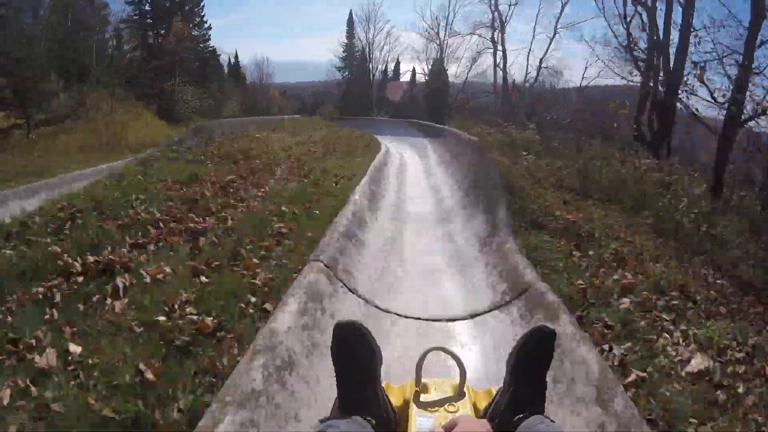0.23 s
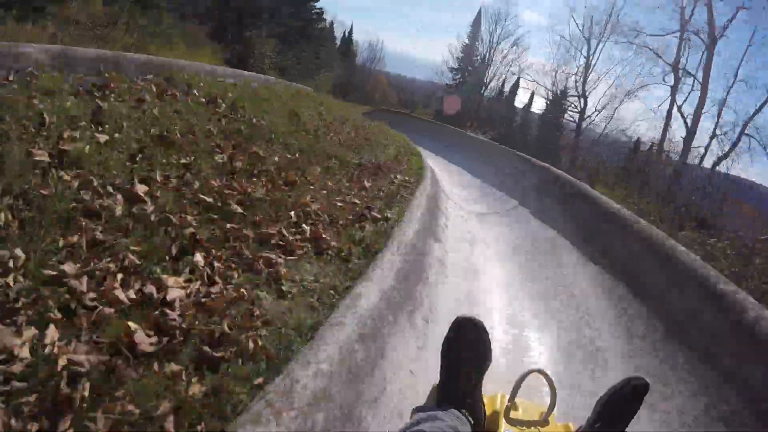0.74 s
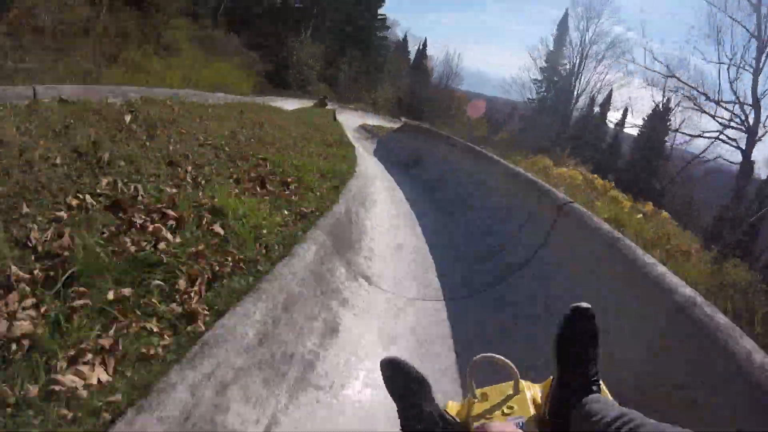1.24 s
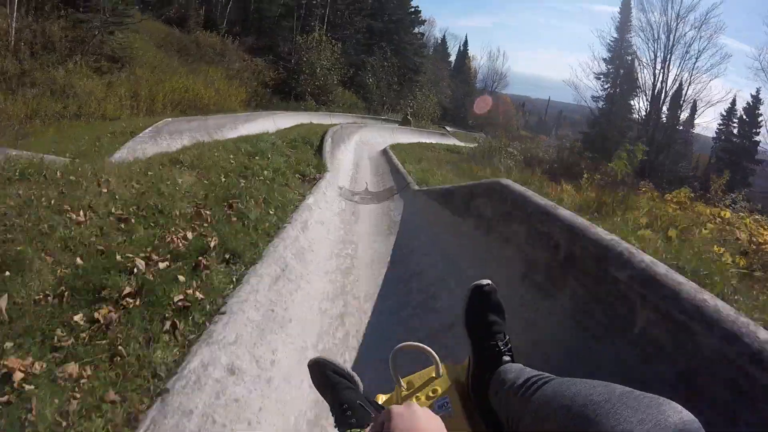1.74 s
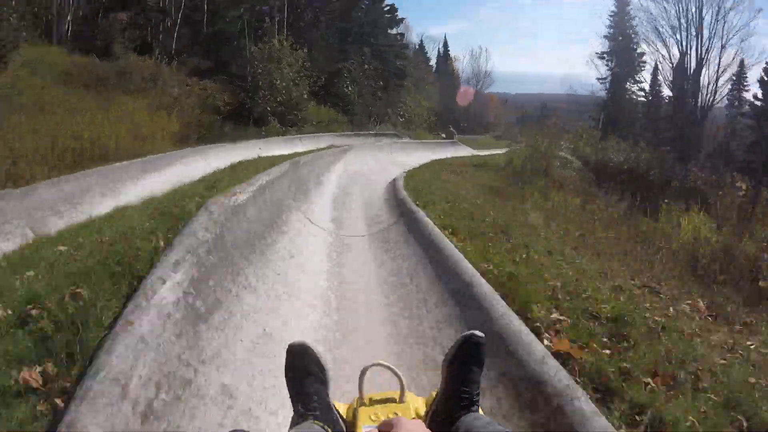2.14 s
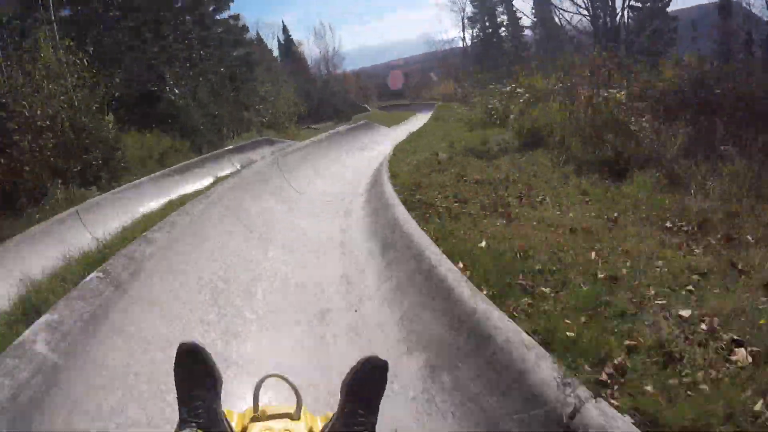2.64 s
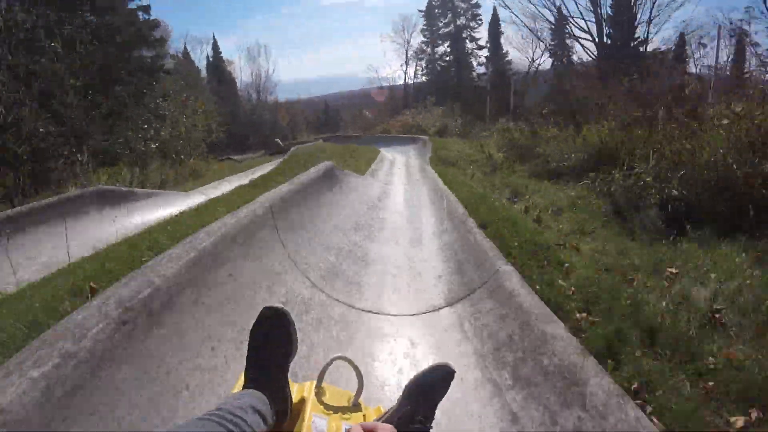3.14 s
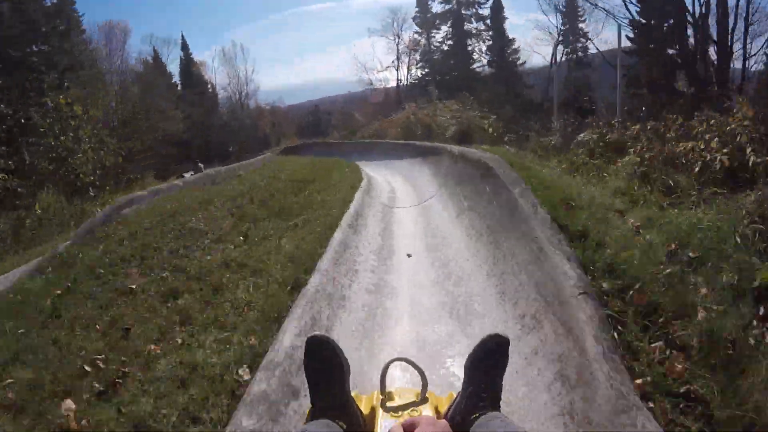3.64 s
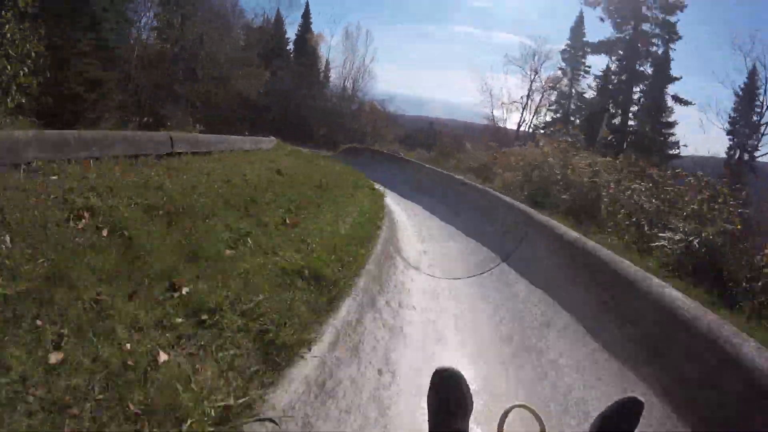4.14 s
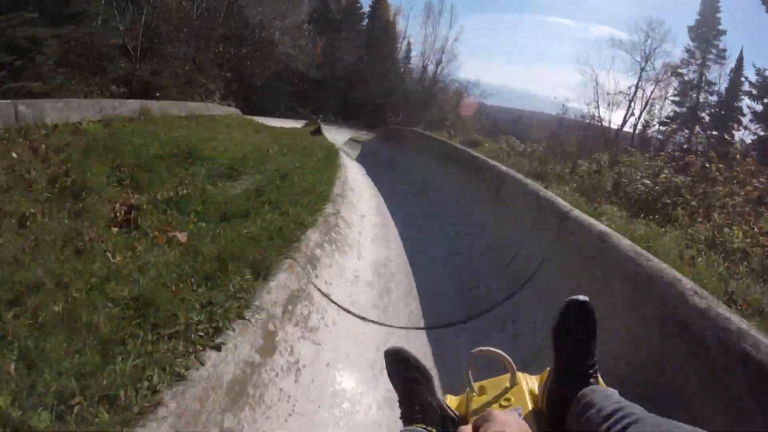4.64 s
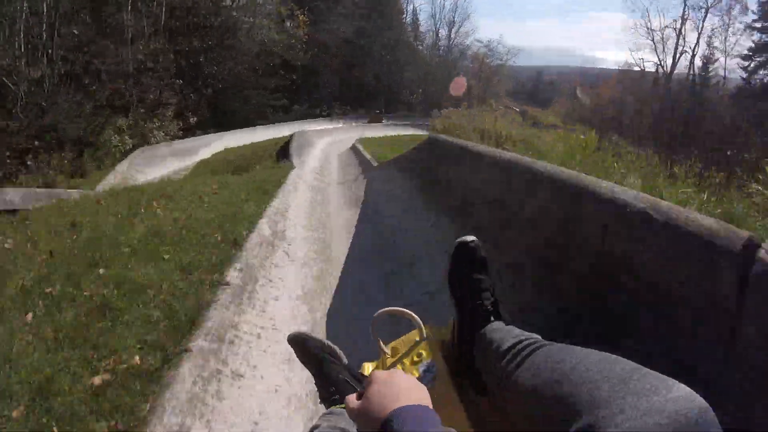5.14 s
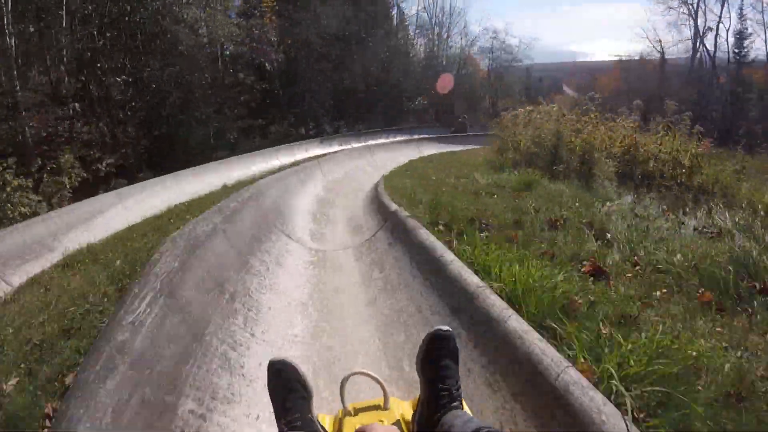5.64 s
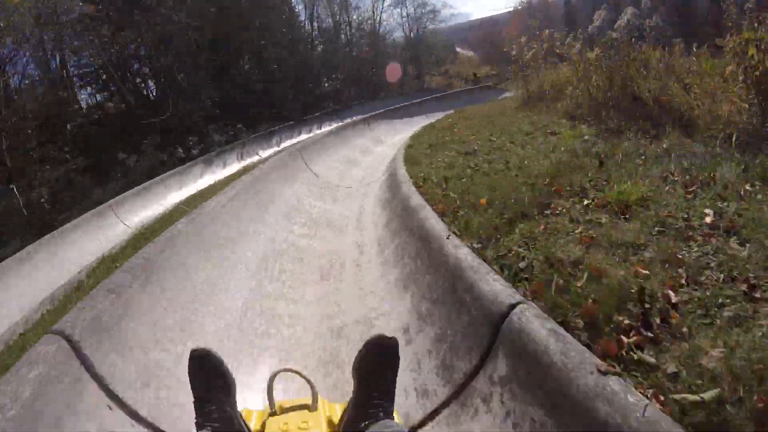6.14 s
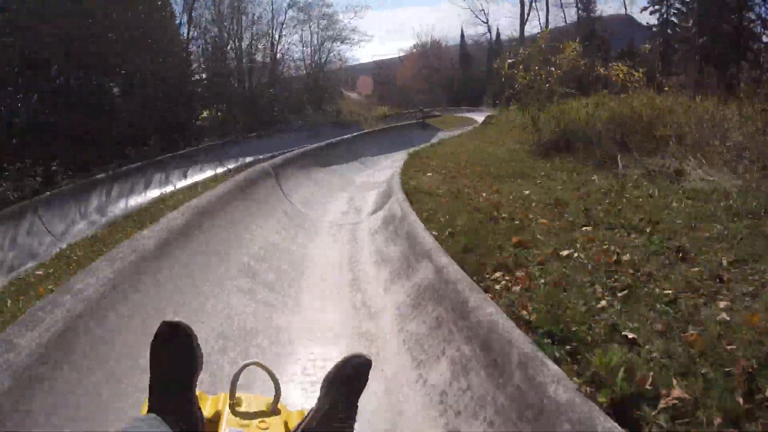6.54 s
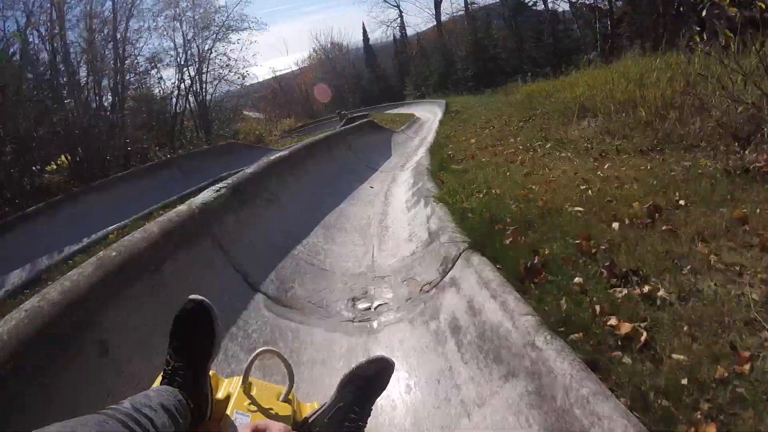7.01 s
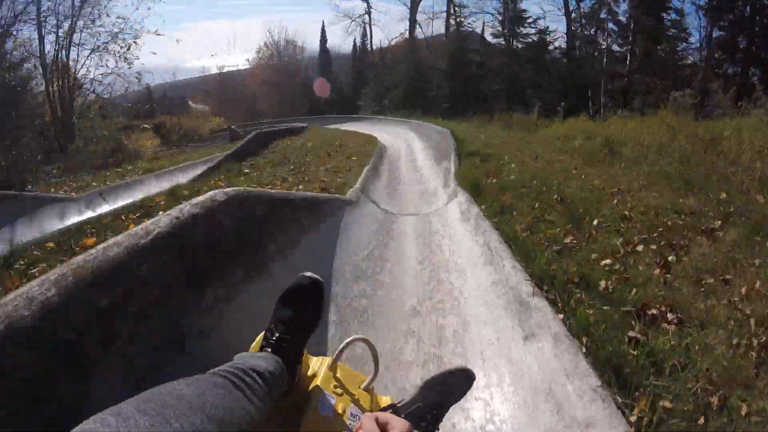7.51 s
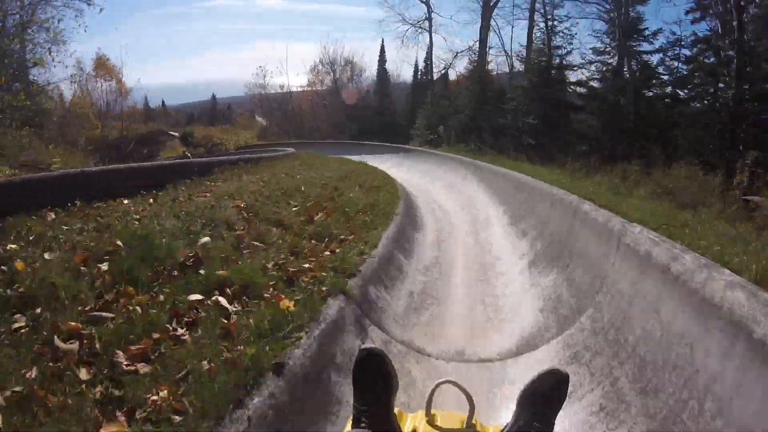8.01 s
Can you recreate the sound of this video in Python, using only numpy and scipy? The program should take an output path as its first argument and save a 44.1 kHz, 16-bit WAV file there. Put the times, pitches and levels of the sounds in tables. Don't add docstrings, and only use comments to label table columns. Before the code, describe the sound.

Steady, uneven sled rumble with muffled wheel grind and fine grit hiss, close and dry outdoors. Wind thuds and flutters on the microphone housing. Slab joints give sudden blunt thumps, each briefly ducking the other sound; small rattles and short hollow body rings fill the gaps. Heavy knocks cluster in the first two seconds, before five and past seven, ending in a low wind gust.

```python
import sys
import numpy as np
from scipy import signal
from scipy.fft import irfft, next_fast_len
from scipy.io import wavfile
from scipy.ndimage import uniform_filter1d

SR = 44100
rng = np.random.default_rng(int(sys.argv[2]) if len(sys.argv) > 2 else 0)


def convert_level_to_amplitude(level_db):
    exponent = np.asarray(level_db, float) / 20
    return 10 ** exponent


def wav_record(signal):
    frames = np.transpose(np.atleast_2d(signal))
    bounded = np.clip(frames, -1, 1)
    quanta = np.round(bounded * 32767).astype(np.int16)
    wavfile.write(sys.argv[1], SR, quanta)


N = 364707
WHEELBASE_S = 0.049


def evened(x):
    return x / np.sqrt(np.mean(x ** 2) + 1e-20)


def read(points, hz):
    f, db = np.transpose(points)
    return np.interp(np.log(hz + 1), np.log(f + 1), db, left=-100, right=-100)


def add(mix, s, sound):
    part = mix[max(round(s * SR), 0):][:len(sound)]
    part += sound[:len(part)]


def colour(points, size=4096):
    log_gain = np.log(convert_level_to_amplitude(read(points, abs(np.fft.fftfreq(size, 1 / SR)))))
    spectrum = np.exp(np.conj(signal.hilbert(log_gain)))
    taps = np.fft.ifft(spectrum).real[:size // 2]
    return taps / np.linalg.norm(taps)


def wander(hz):
    f = np.fft.rfftfreq(next_fast_len(N), 1 / SR)
    z = rng.standard_normal((len(f), 2)) @ [1, 1j]
    slope = (f > 3) / np.sqrt(f + 1) / (1 + (f / hz) ** 4)
    return evened(irfft(z * slope)[:N])


def patchy(points, patch_db, size):
    hop = size // 4
    a, b, patches = rng.standard_normal((N // hop + 5, size // 2 + 1, 3)).T
    patches = uniform_filter1d(patches, size=4, axis=0)
    patches = evened(uniform_filter1d(patches, size=8, axis=1))
    spectrum_db = read(points, np.fft.rfftfreq(size, 1 / SR))[:, None]
    z = (a + 1j * b) * convert_level_to_amplitude(spectrum_db + patch_db * patches)
    return evened(signal.istft(z, nperseg=size, noverlap=size - hop)[1][:N])


# (time [s], drop [dB], recovery [s])
DUCKS = [(0.2, 1, 0.055), (0.496, 7, 0.092), (1.155, 3, 0.11), (1.465, 7, 0.092), (2.202, 4.5, 0.16),
         (4.465, 3, 0.069), (4.862, 7.5, 0.19), (6.665, 8.5, 0.071), (7.229, 6, 0.13), (7.531, 6.5, 0.14),
         (7.98, 3.5, 0.082)]


def duck_db(t):
    drop_in_s = 0.0054
    total = 0
    for s, drop_db, recovery_s in DUCKS:
        onset = np.clip((t - s) / drop_in_s + 1, 0, 1)
        recovery = np.exp(-np.maximum(t - s, 0) / recovery_s)
        total = total - drop_db * onset * recovery
    return total


# (frequency [Hz], level [dB per Hz])
WIND_SPECTRUM = [(8.8, -38.5), (15, -8), (54, 0), (177, -9.5), (260, -12), (340, -24), (570, -120)]
# (frequency [Hz], level [dB per Hz])
AIR_SPECTRUM = [(1500, -27), (3000, -0.5), (4700, -8.5), (6000, -5), (7000, -2.5), (8000, -10.5),
                (12200, -2), (14000, -28.5), (16500, -43.5)]
# (time [s], level [dB])
GUSTS = [(0.1, -21.5), (0.35, -16.5), (0.9, -19), (1.3, -24), (1.68, -15.5), (1.82, -24.5), (2.35, -14.5),
         (2.55, -23.5), (2.72, -16.5), (3.15, -27.5), (3.52, -18.5), (4.7, -17), (5.25, -23.5), (5.55, -17),
         (6.0, -24.5), (7.95, -22), (8.2, -11), (8.27, -22)]


def wind():
    t = np.arange(N) / SR
    rush = convert_level_to_amplitude(-76) * patchy(AIR_SPECTRUM, 0.89, size=512)
    gust_s, gust_db = np.transpose(GUSTS)
    level_db = np.interp(t, gust_s, gust_db) + 1.64 * duck_db(t)
    return convert_level_to_amplitude(level_db) * patchy(WIND_SPECTRUM, 2.8, size=2048) + rush


def rear_hits():
    hard_db = -4
    return [(s + WHEELBASE_S, db) for s, db, *rest in KNOCKS if db > hard_db]


# (time [s], load on the wheels [dB], grit on the slab [dB])
TRACK = [(0.0, 1, 1), (0.45, 0.5, -1), (1.08, 1.5, 1.5), (1.4, 1, -2), (1.8, 1, 0.5), (2.15, 0.5, 1),
         (2.5, -1, 4.5), (2.62, 6, 1.5), (3.2, 4, -2), (3.58, 2, 4), (3.8, 0, -2), (4.3, 2.5, -1.5),
         (4.75, -2.5, 1), (5.399, 2, 2), (5.7, 0, -2), (7.0, 2.5, -2), (7.75, -1.5, 3.5), (8.27, -2, 3)]
# (centre [s], half length [s], load [dB], grit [dB])
RUBS = [(0.432, 0.012, 5, -11), (0.694, .04, 0, 5.5), (1.343, 0.024, 5.5, -4), (1.42, 0.008, 10.5, -4),
        (2.203, 0.035, 5, -8), (3.59, 0.03, 1.5, -4.5), (4.414, 0.018, 7, -7), (4.828, 0.039, 9, -11),
        (5.1, 0.035, 6.5, -5.5), (6.647, 0.031, 4, 2.5), (6.776, 0.017, 6.5, 0.5),
        (7.007, 0.057, 4.5, -2.5), (7.195, 0.025, 2, 0), (7.51, 0.053, 4, -2), (7.952, 0.032, 7, -9),
        (1.624, 0.046, 2.5, 3.5), (2.05, 0.06, 2.5, -1), (2.728, 0.024, 0, -1.5), (5.448, 0.1, -2, 7.5),
        (5.622, .05, -3, 4), (5.97, .06, -3.5, 7.5), (6.193, 0.13, 2.5, 1.5), (7.716, 0.077, 2, 4.5),
        (6.341, 0.0081, 6.5, -5), (0.85, 0.04, 1.5, -4.5), (5.164, 0.016, -2, -3), (2.305, 0.026, -3, 3)]
# (landing [s], time in the air [s], loss of load [dB])
HOPS = [(0.152, 0.063, 6), (0.79, 0.086, 2), (1.6, 0.098, 2), (1.89, 0.095, 7), (2.588, 0.087, 2),
        (3.72, 0.15, 0.5), (3.937, 0.14, 5), (4.021, 0.12, 3.5), (4.801, 0.024, -1.5), (5.261, 0.16, 0.5),
        (5.359, 0.074, 9.5), (6.062, 0.038, 5.5), (6.135, 0.053, 4), (7.935, 0.033, 4.5),
        (0.842, 0.023, 2.5), (1.138, 0.017, 5.5), (2.14, 0.013, 5), (3.764, 0.015, 4.5), (6.164, .02, 4),
        (6.287, 0.021, 3.5), (6.622, 0.025, 3), (7.514, 0.016, 3.5)]


def contact(t):
    slam_share, slam_s = 0.44, 0.023
    settle = 90
    s, load, grit = np.transpose(TRACK)
    load, grit = np.interp(t, s, load), np.interp(t, s, grit)
    for mid, half, load_db, grit_db in RUBS:
        bell = np.exp(-((t - mid) / half) ** 2)
        load, grit = load + load_db * bell, grit + grit_db * bell
    rear_hops = [(s, 0.42 * WHEELBASE_S, 1.5) for s, db in rear_hits()]
    for land, air, loss_db in HOPS + rear_hops:
        light = np.clip(1 + (t - land) / air, 0, 1) * (t < land)
        slam = slam_share * np.exp(-abs(t - land) / slam_s) * (t >= land)
        load = load + loss_db * (slam - np.sqrt(light))
    load = uniform_filter1d(uniform_filter1d(load, size=settle), size=settle)
    return load, grit


# (centre [s], half length [s], level [dB])
SCRAPES = [
    (0.2, 0.024, -5),
    (4.154, 0.04, 6.5),
    (4.295, 0.076, 8),
    (4.575, 0.069, 7.5),
    (6.25, 0.095, -2.5),
]


def scrape_db(t):
    return sum(db * np.exp(-((t - mid) / half) ** 2) for mid, half, db in SCRAPES)


# (frequency [Hz], level [dB per Hz])
BODY = [(90, -40), (170, -1.5), (260, -1), (360, 0.5), (480, -5.5), (830, -6), (1100, -20), (1500, -44.5),
        (2400, -59.5)]
# (frequency [Hz], level [dB per Hz])
GRIND = [(600, -26), (1200, 4.5), (1770, -2.5), (2570, -5), (2840, -14), (3740, -9), (4200, -20),
         (4800, -26.5), (5600, -51.5)]
# (frequency [Hz], level [dB per Hz])
HISS = [(3800, -35.5), (4800, -8.5), (5800, -2), (6700, -3.5), (7600, -15), (9000, -16.5), (11900, -21),
        (14000, -34.5), (16500, -54)]


def rolling():
    t = np.arange(N) / SR
    shake = wander(120)
    body = patchy(BODY, 1.03, size=512) * convert_level_to_amplitude(2.15 * shake + wander(90))

    grain_size = convert_level_to_amplitude(1.3 * np.minimum(rng.exponential(1, N), 5))
    struck = rng.random(N) < 400 / SR
    grit = grain_size * struck * rng.choice([-1.0, 1.0], N)
    grains = evened(signal.oaconvolve(grit, colour(GRIND))[:N])
    grind = (patchy(GRIND, 2.2, size=256) + 0.36 * grains) * convert_level_to_amplitude(1.5 * shake + 0.58 * wander(150))
    hiss = patchy(HISS, 2.4, size=256) * convert_level_to_amplitude(2.1 * shake + 0.58 * wander(150))

    load, rough = contact(t)
    load = load + duck_db(t)
    body_db = -24 + load
    grind_db = -48 + 1.11 * load + 0.6 * rough + scrape_db(t)
    hiss_db = -63.5 + 1.11 * load + rough
    return convert_level_to_amplitude(body_db) * evened(body) + convert_level_to_amplitude(grind_db) * evened(grind) + convert_level_to_amplitude(hiss_db) * evened(hiss)


# (time [s], crack level [dB], decay by 60 dB [s])
JOLTS = [(0.196, -27, 0.038), (0.4414, -28.5, .03), (0.486, -21, 0.021), (1.4162, -36, .041),
         (1.7624, -27, .03), (1.8891, -32, .08), (1.9669, -29, .034), (2.1705, -24, .042),
         (2.4563, -38, .02), (2.589, -28, 0.023), (3.8478, -27, 0.013), (3.9345, -30, .026),
         (4.0203, -25.5, .021), (4.4532, -20, 0.024), (5.2719, -26, 0.023), (5.3582, -24, 0.034),
         (5.5074, -28, 0.088), (5.6161, -27, .03), (6.0616, -25, 0.057), (6.1639, -22.5, 0.028),
         (6.2871, -24.5, .024), (6.3804, -25, 0.039), (6.4837, -27.5, 0.04), (6.8528, -26, 0.044),
         (7.0698, -24.5, .03), (7.1546, -24, 0.024), (7.4515, -27.5, 0.07), (7.5156, -10.5, 0.016),
         (7.9374, -20.5, .036), (7.9554, -20, 0.03)]
# (time [s], crack level [dB])
CHATTER = [(2.84, -25.5), (2.87, -32), (2.9148, -24), (2.9942, -24), (3.042, -29), (3.1425, -23.5),
           (3.2106, -23.5), (3.302, -25.5), (3.386, -24.5), (3.4116, -36), (3.4979, -24.5), (3.598, -25),
           (6.9381, -24.5), (6.9778, -21.5), (7.0137, -19.5), (7.0234, -22), (0.153, -41), (0.2754, -41),
           (0.379, -35), (0.7994, -36), (1.053, -32), (1.8148, -39), (4.9332, -36), (5.0893, -36),
           (5.403, -36), (6.3395, -31), (8.1857, -33), (3.75, -33), (4.2492, -31), (4.705, -33)]


def jolts():
    t, out = np.arange(3000) / SR, np.zeros(N)
    rows = JOLTS + [(s, db, 0.06) for s, db in CHATTER]
    rows += [(s, db - 35, 0.024) for s, db in rear_hits()]
    grind, hiss = colour(GRIND), colour(HISS)
    for s, db, t60 in rows:
        a, b = rng.standard_normal((2, len(t)))
        burst = (1 - np.exp(-t / 0.00016)) * convert_level_to_amplitude(-60 * t / t60)
        low_crack = signal.fftconvolve(a * burst, grind)
        high_crack = signal.fftconvolve(b * burst, hiss)
        add(out, s, convert_level_to_amplitude(db - 8.5) * (low_crack + convert_level_to_amplitude(-17.5) * high_crack))
    return out


# (time [s], ring level [dB], ring frequency [Hz])
BUMPS = [(0.406, -16, 480), (0.843, -7, 600), (2.72, 0.5, 272), (1.331, -4, 645), (5.93, -3.5, 396),
         (1.76, -5.5, 790), (1.816, -3, 275), (1.89, -5, 590), (2.14, -1, 422), (2.456, -7, 844),
         (2.839, -20, 440), (3.222, -2, 447), (3.602, -1, 544), (3.764, 0.5, 325), (3.955, -8, 238),
         (4.126, -4.5, 503), (5.66, 1, 280), (5.018, -5.5, 390), (5.065, -6.5, 700), (5.103, -5.5, 288),
         (5.155, 2, 260), (5.333, -12, 250), (5.402, -6, 850), (5.612, 3.5, 360), (5.804, -1, 252),
         (6.062, 0.5, 810), (6.163, -10, 585), (6.287, -1, 343), (6.542, -16.5, 730), (7.954, -2.5, 584)]


def bumps():
    t, out = np.arange(4000) / SR, np.zeros(N)
    rows = BUMPS + [(s, db - 7, 390) for s, db in rear_hits()]
    blunt = signal.butter(3, 1300, fs=SR)
    for s, db, hz in rows:
        blow = 1.2 * (t == 0)
        shaking = (blow + 0.23 * rng.standard_normal(len(t))) * convert_level_to_amplitude(-60 * t / 0.06)
        mode = convert_level_to_amplitude(-60 * t / 0.028) * np.sin(2 * np.pi * hz * t)
        ring = signal.fftconvolve(shaking, mode)[:len(t)]
        add(out, s, convert_level_to_amplitude(db - 8.5) * signal.lfilter(*blunt, ring) / abs(ring).max())
    return out


# (main swing [s], blow level [dB], ring frequency [Hz], length [ms], slap over the blow [dB])
KNOCKS = [(0.152, -5, 390, 0.53, -28), (0.4896, -4, 334, 1.9, -26), (1.1428, -3.5, 308, 1.35, -35),
          (1.4543, 2, 378, 1.43, -24.5), (2.1861, -6, 314, 2.3, -30), (4.456, 1, 334, 1.25, -33),
          (4.845, 4.5, 408, 1.4, -18.5), (6.657, -7, 282, 4.2, -22), (7.2161, 3, 409, 1.6, -10),
          (7.5181, 4, 334, 1.16, -28), (7.965, -9, 475, 0.43, -14)]


def knocks():
    lead = 0.01
    slap_hz, tail_t60_s = 1320, 0.045
    t, out = np.arange(2000) / SR - lead, np.zeros(N)
    slap_band = signal.butter(2, [700, 2200], "band", fs=SR)
    tail_band = signal.butter(4, [400, 1060], "band", fs=SR, output="sos")
    for s, db, hz, ms, slap_db in KNOCKS:
        noise = rng.standard_normal(len(t))
        width_ms = np.where(t < 0, ms, 0.66 * ms)
        swing = np.exp(-(1000 * t / width_ms) ** 2 / 2) * np.cos(2 * np.pi * hz * t)

        rough = evened(signal.lfilter(*slap_band, noise))
        early = np.exp(-((1000 * t + 0.8) / 1.1) ** 2 / 2)
        slap = early * (np.cos(2 * np.pi * slap_hz * (t + 0.001)) + 0.53 * rough)

        dull = evened(signal.sosfilt(tail_band, noise))
        tail = convert_level_to_amplitude(-4 - 60 * abs(t) / tail_t60_s) * np.clip(t / 0.0018, 0, 1) * dull
        add(out, s - lead, convert_level_to_amplitude(db) * (swing + convert_level_to_amplitude(slap_db) * (slap + tail)))
    return out


def scene():
    fade_in = np.minimum(np.arange(N) / (0.004 * SR), 1)
    return (fade_in * (wind() + rolling() + jolts() + bumps() + knocks()))[None]


def top_edge(x):
    hz, t, z = signal.stft(x, SR, nperseg=1024)
    treble = z[(hz > 8000) & (hz < 12000)]
    top_db = 10 * np.log10((abs(treble) ** 2).mean(0) + 1e-20)
    slow_db = uniform_filter1d(top_db, size=9)
    drift = evened(uniform_filter1d(rng.standard_normal(len(t)), size=15))
    edge_hz = 12150 + 70 * (slow_db - np.median(slow_db)) + 500 * drift
    edge_hz = np.clip(edge_hz // 700 * 700, 10500, 12600) + 100
    tick = top_db - slow_db + 1.2 * rng.standard_normal(len(t)) > 4.5
    edge_hz = np.where(tick, 15600, edge_hz)

    chance = rng.random((len(hz) // 8 + 1, len(t) // 3 + 1))
    chance = np.repeat(np.repeat(chance, 8, 0), 3, 1)[:len(hz), :len(t)]
    spared = chance > 0.5 * np.clip((hz[:, None] - 8500) / 4000, 0, 1)
    kept = (hz[:, None] < edge_hz) & (spared | (edge_hz > 15000))
    return signal.istft(z * np.where(kept, 1, convert_level_to_amplitude(-25.5)), SR, nperseg=1024)[1][:N]


def band_limit(x):
    return signal.sosfilt(signal.butter(12, 15600, fs=SR, output="sos"), x)


def record(dry):
    ceiling = 0.7
    peak_db = 20 * np.log10(abs(dry[0]) + 1e-9)
    fall = np.arange(N) * 210 / SR
    held_db = np.maximum.accumulate(peak_db + fall) - fall
    over_db = np.maximum(held_db - 0.5, 0)
    lagged_db = uniform_filter1d(over_db, size=301, origin=150)
    ducked = dry / convert_level_to_amplitude(0.5 * lagged_db) / ceiling
    clipped = ceiling * ducked / (1 + ducked ** 10) ** 0.1
    mix = top_edge(clipped[0])[None]
    return band_limit(mix)


dry = scene()
out = record(dry)
wav_record(out)
```